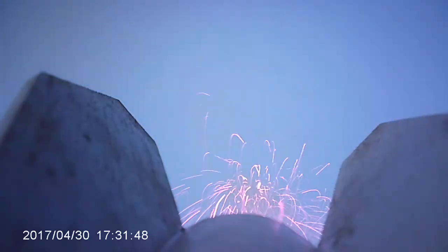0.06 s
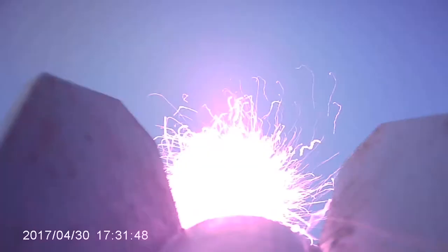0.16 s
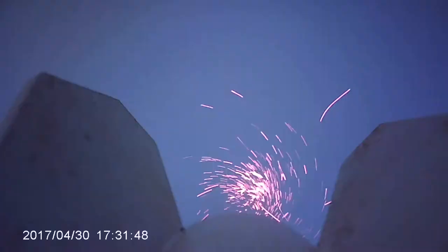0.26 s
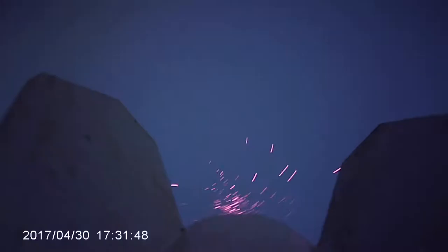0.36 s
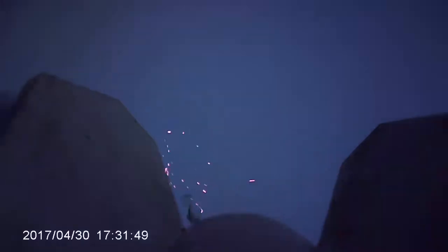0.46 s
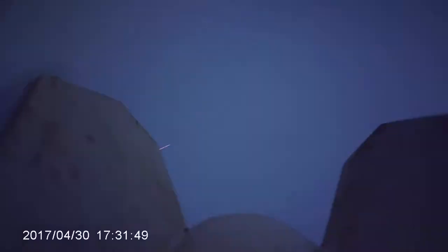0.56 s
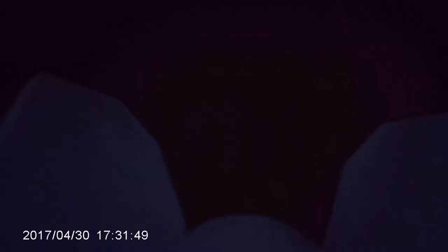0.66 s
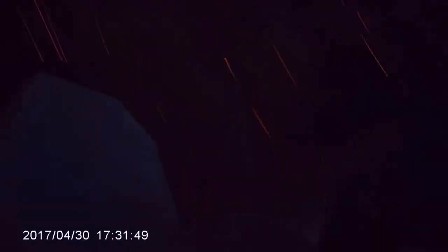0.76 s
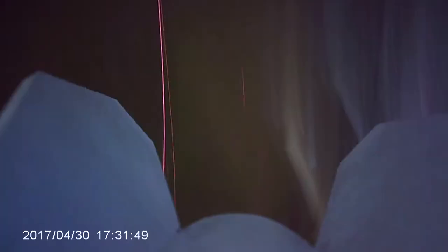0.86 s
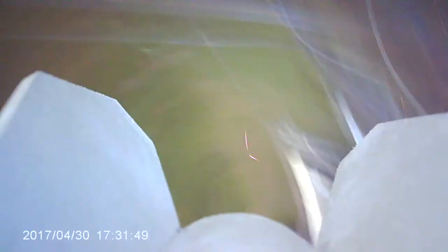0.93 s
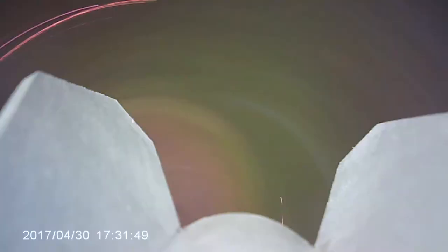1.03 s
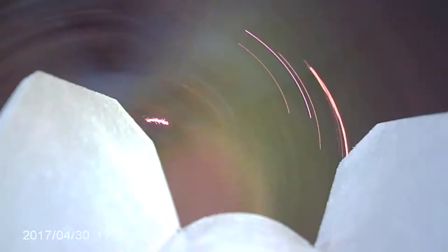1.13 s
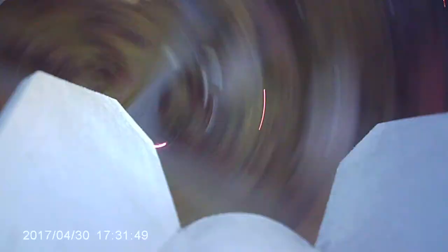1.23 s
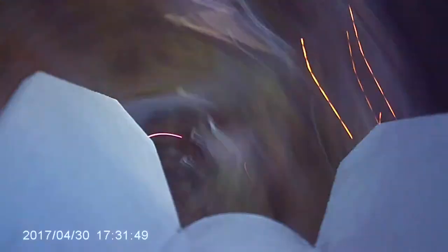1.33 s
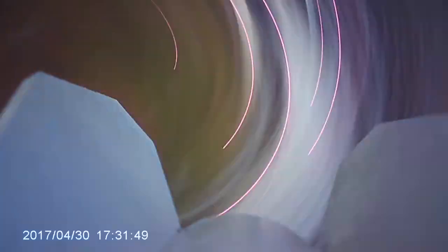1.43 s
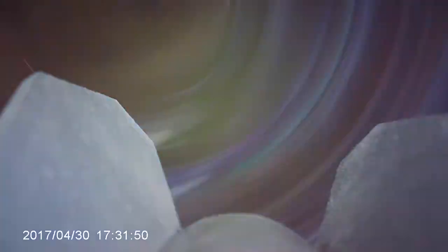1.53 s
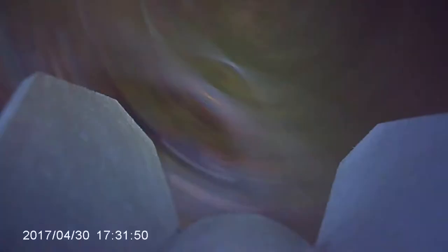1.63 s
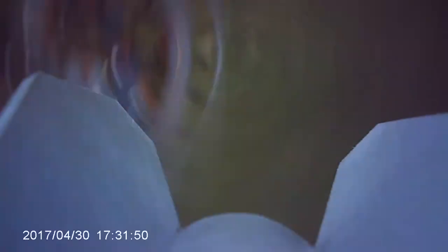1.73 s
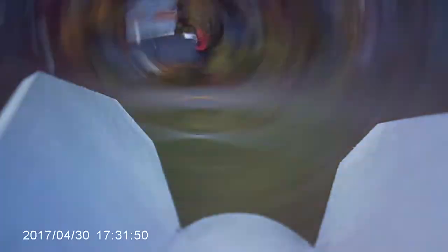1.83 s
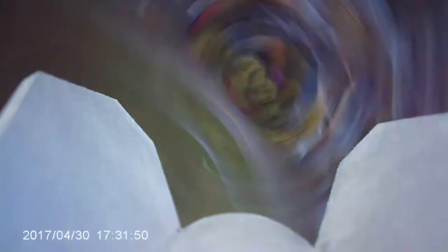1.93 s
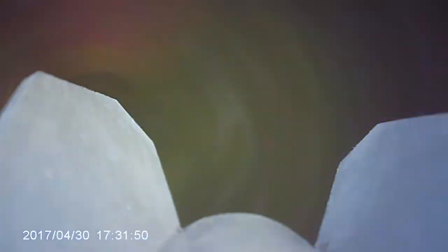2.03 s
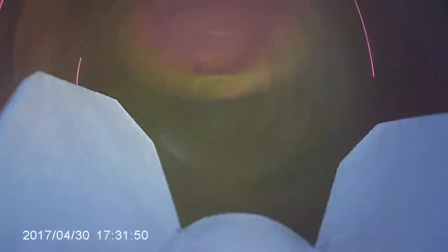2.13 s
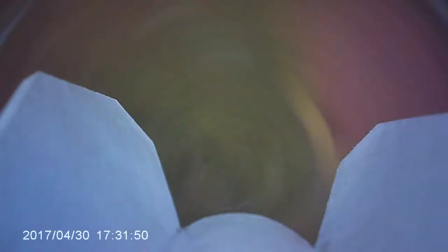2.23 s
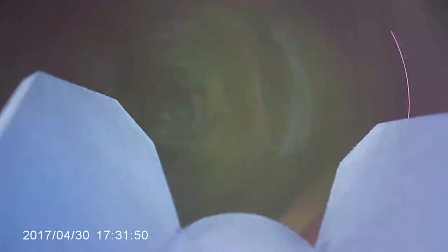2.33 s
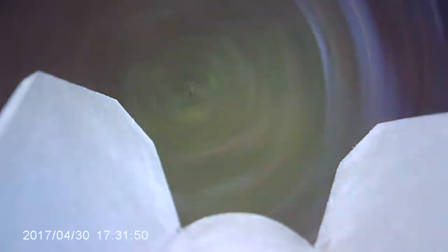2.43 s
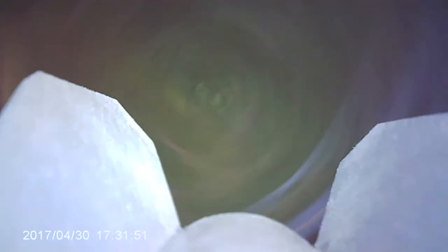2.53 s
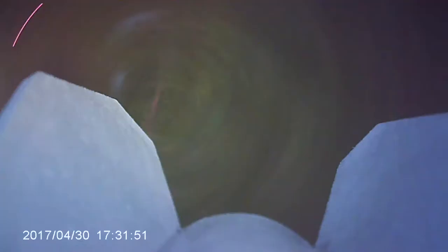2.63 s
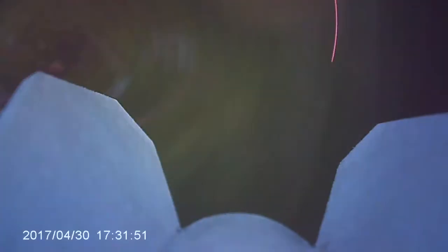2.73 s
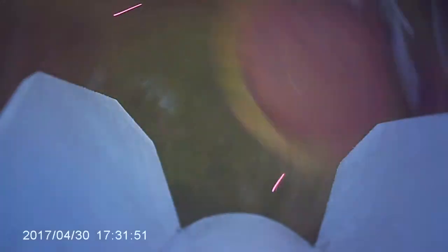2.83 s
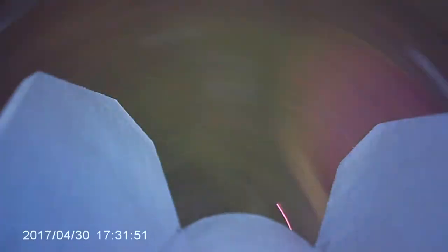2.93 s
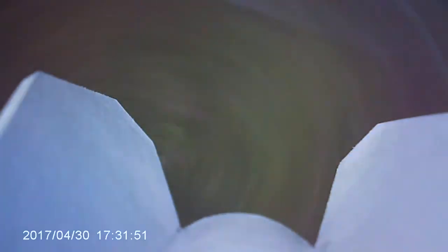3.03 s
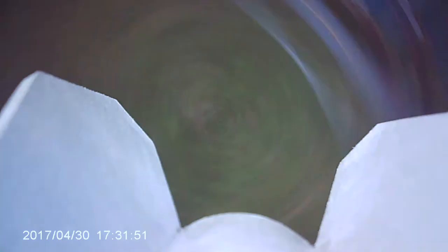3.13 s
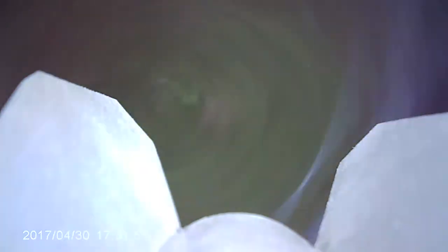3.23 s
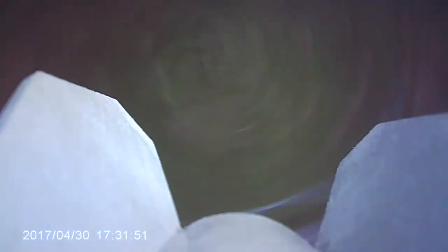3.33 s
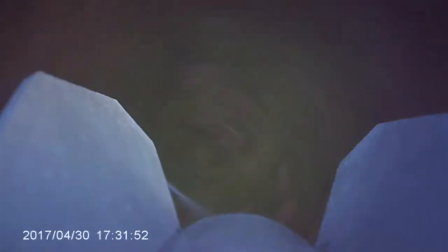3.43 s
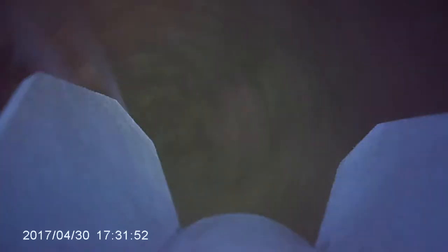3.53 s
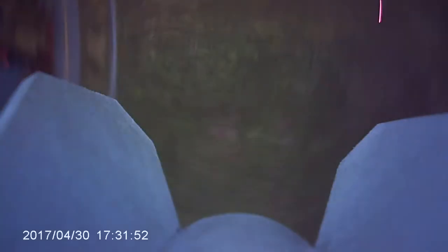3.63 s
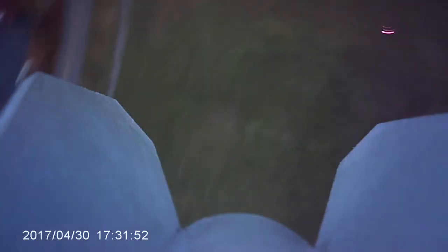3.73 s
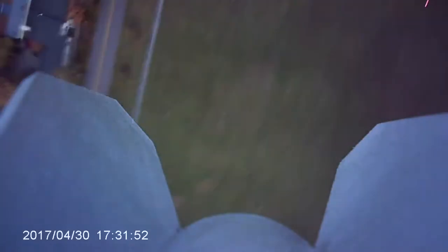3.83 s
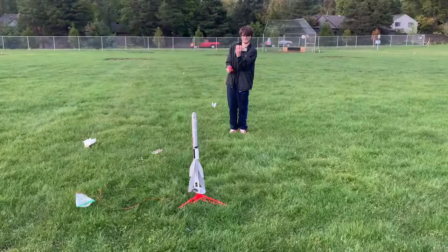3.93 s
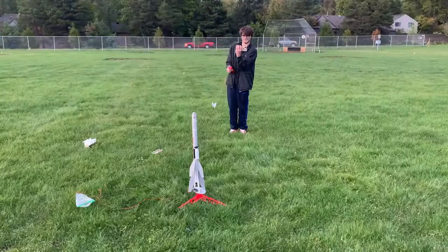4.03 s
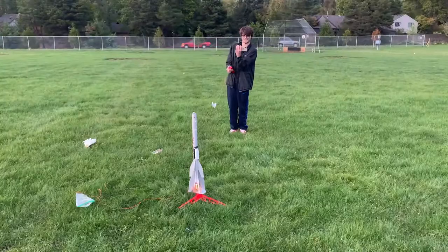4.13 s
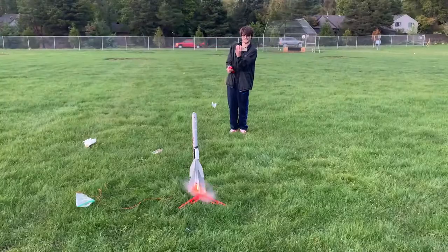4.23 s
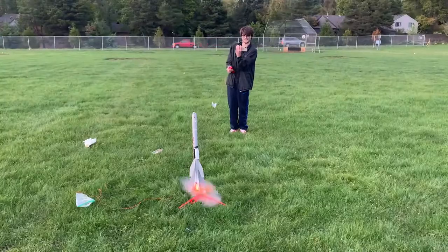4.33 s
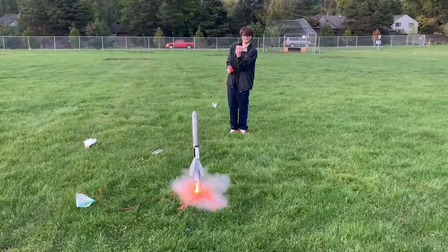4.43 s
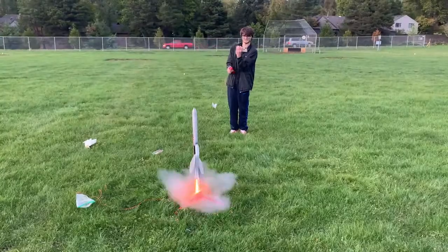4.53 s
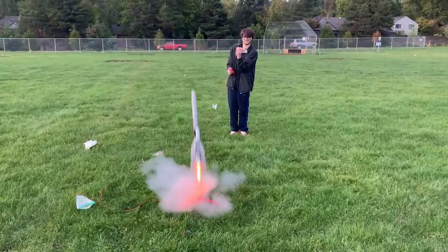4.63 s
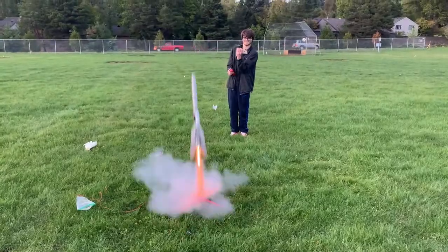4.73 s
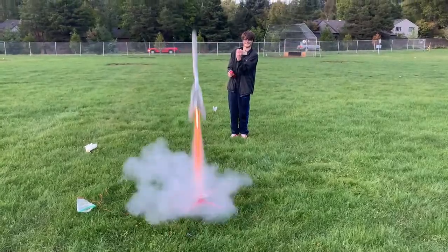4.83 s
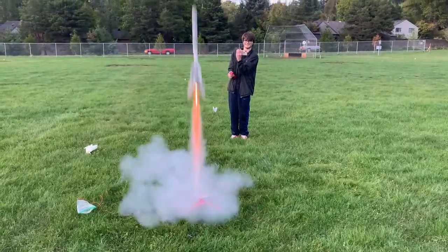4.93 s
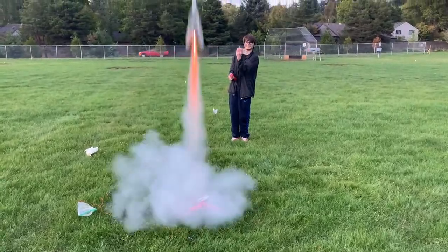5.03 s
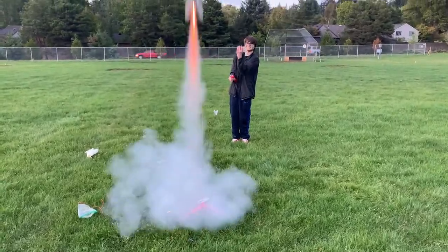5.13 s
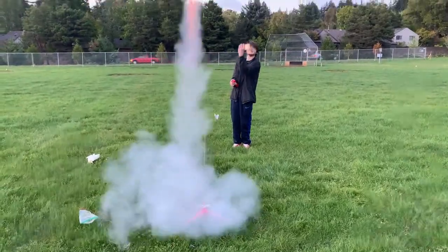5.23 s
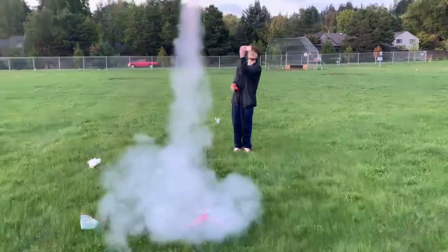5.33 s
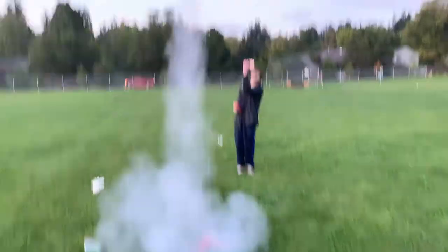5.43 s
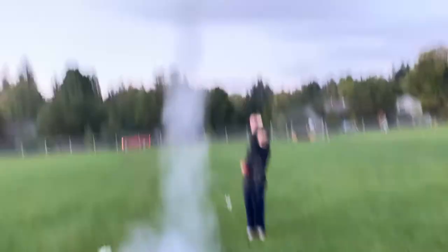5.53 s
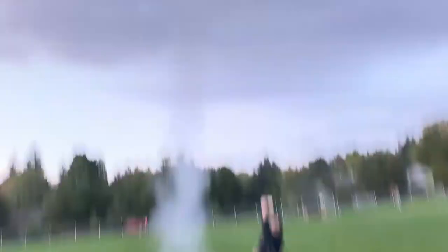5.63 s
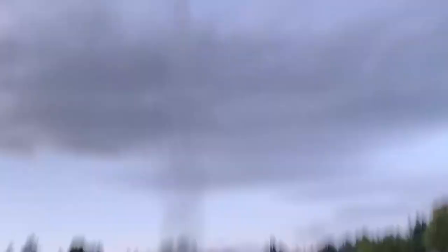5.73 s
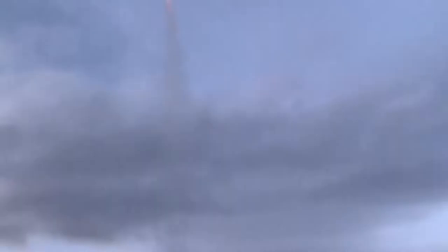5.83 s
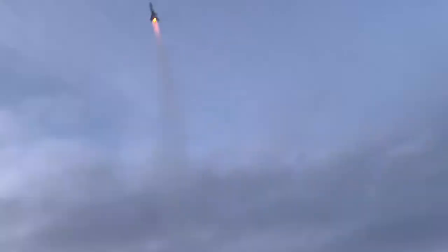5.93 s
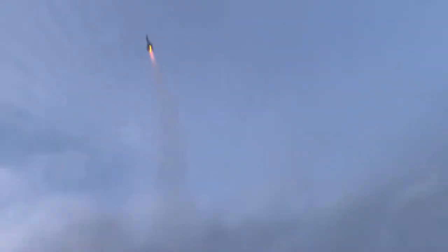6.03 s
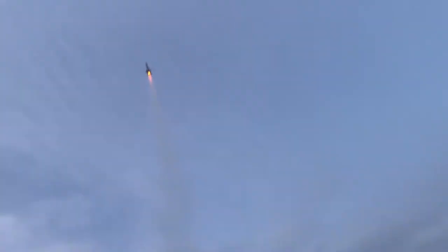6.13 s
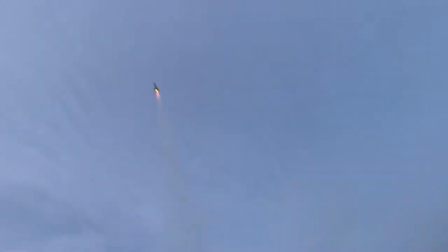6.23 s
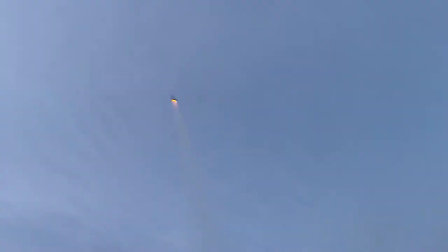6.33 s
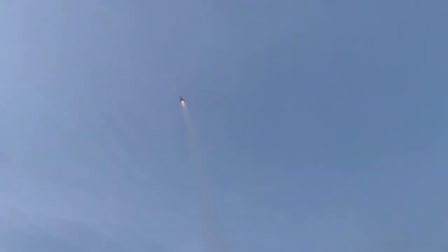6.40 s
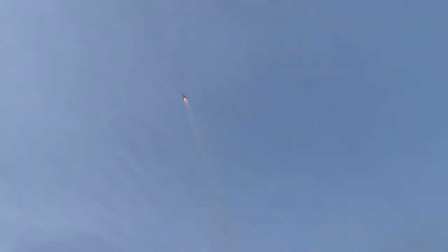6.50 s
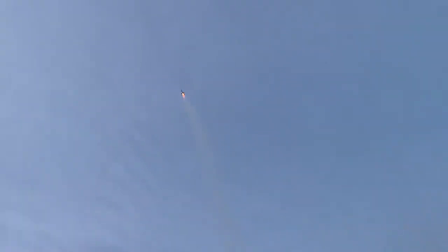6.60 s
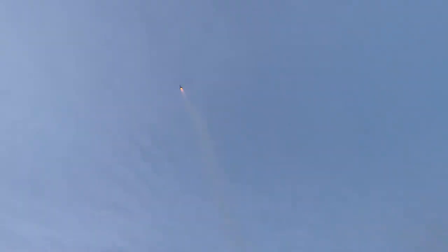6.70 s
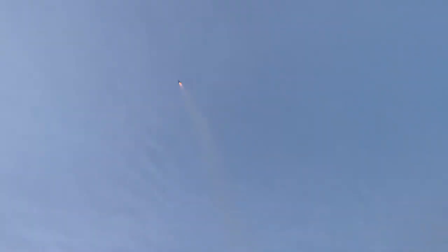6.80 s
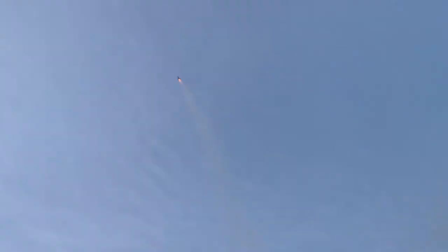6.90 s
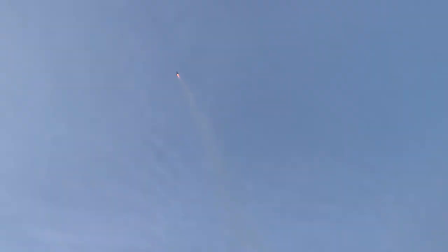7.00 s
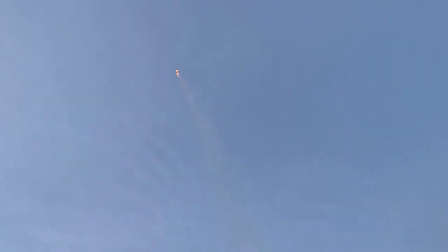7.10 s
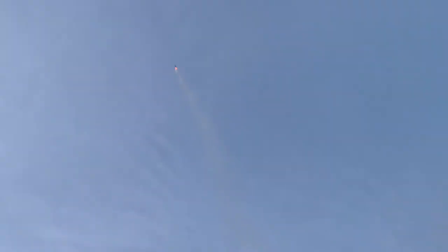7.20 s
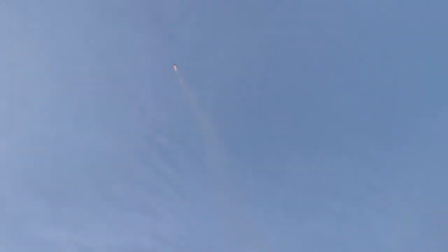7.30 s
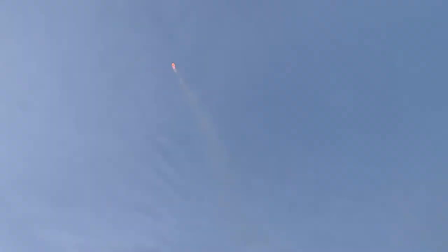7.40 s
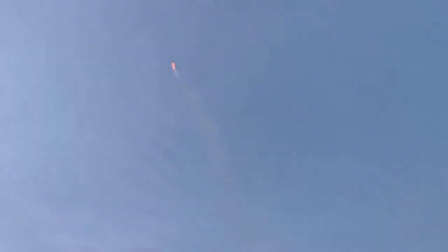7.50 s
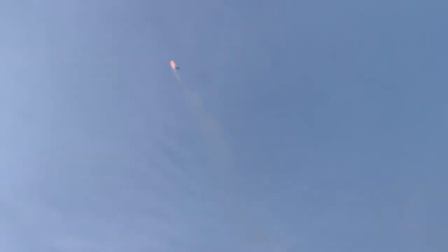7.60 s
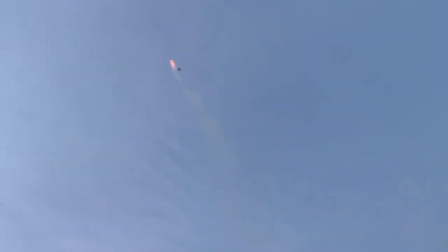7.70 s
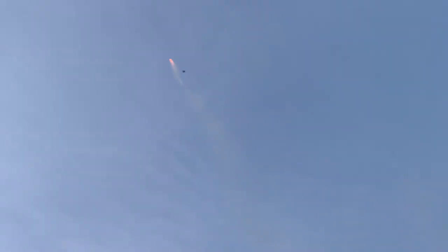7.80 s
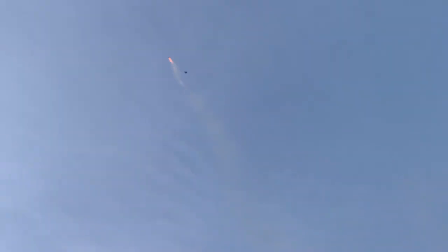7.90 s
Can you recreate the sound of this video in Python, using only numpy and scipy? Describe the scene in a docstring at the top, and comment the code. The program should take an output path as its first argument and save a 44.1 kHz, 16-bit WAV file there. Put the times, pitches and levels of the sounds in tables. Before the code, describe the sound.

Close on a model rocket's body, sharp plastic knocks, tube rattle, hum and buffeting crowd the first half second, with a low motor boom and fizzing sparks. Scattered knocks and rubs thin into faint rumbling air. A cut to an open field brings a slowed ignition pop and loud, broad hiss, which climbs away and fades; much later a second stage swells faintly overhead.

```python
"""Sharp knocks crack out first: we ride on a model rocket whose tube rattles, hums and rubs while air buffets the port.
The motor booms up among sparks (clicks and fizz); later a thin rush of filtered noise is left, with stray thumps.
A quick cut goes to the field: a motor pops alight and hisses off the pad at half speed, climbs away in real
time, burns out at half speed again, and a second stage roars up far overhead. Jets are banded noise whose
eddies swell separately; blows are short bursts through resonances of the tube and the camera shell."""
import sys
import numpy as np
from scipy import signal
from scipy.fft import rfft, irfft
from scipy.io import wavfile
from scipy.ndimage import uniform_filter1d

SR = 44100
rng = np.random.default_rng(int(sys.argv[2]) if len(sys.argv) > 2 else 0)


def inscribe(sig):
    """Save sig as 16-bit PCM at rate SR to the path in sys.argv[1].

    A 1-D sig is mono; a 2-D sig holds one channel per row.
    Samples are clipped to [-1, 1] before scaling.
    """
    pcm = np.round(np.clip(np.atleast_2d(sig).T, -1, 1) * 32767)
    wavfile.write(sys.argv[1], SR, pcm.astype(np.int16))


N = 351036
TIME = np.arange(N) / SR
LOOP = 180000   # samples in one round of noise
FREQS = np.maximum(np.fft.rfftfreq(LOOP, 1 / SR), 1)
CUT_S, REAL_TIME_S, SLOW_AGAIN_S = 3.927, 5.455, 6.897
ON_BOARD_TOP_HZ, SLOW_TOP_HZ, CUTOFF_HZ = 14000, 9700, 15600

# Levels in the tables are relative: each layer adds its own trim.
# A half_width_hz reaches from the centre to the -6 dB point; a half_length_s from the middle to 1/e.

# colour of the slipstream: pitch_hz, density_db
SLIPSTREAM = [(5, 17), (20, 4.5), (50, 1), (120, -9), (300, -15), (700, -19.5), (2000, -26.5), (5000, -32),
              (9000, -34), (13800, -34), (14400, -67)]
SLIPSTREAM_DB, SLIPSTREAM_FLUTTER_DB = -41.5, 2
RUMBLE_STEADY_S, BOOM_STEADY_S = .07, .03
# air pressure buffeting the on-board port: time_s, level_db
BUFFETING = [(0.0, -57), (0.03, -25.5), (0.09, -57), (0.12, -49), (0.14, -35), (0.23, -22), (0.26, -14.5),
             (0.36, -14.5), (0.39, -32), (0.48, -21.5), (0.61, -51), (0.85, -65), (0.87, -37), (1.17, -47),
             (1.19, -40), (1.38, -56.5), (1.98, -44.5), (2.0, -55)]
# colour of the buffeting: pitch_hz, density_db
BUFFET_COLOUR = [(5, -6), (12, 19.5), (18, 0.5), (27, -25), (40, 0.5), (55, -15), (80, -13), (130, -20.5),
                 (250, -28.5), (600, -62.5)]
BUFFET_DB = 9
# bouts in which the airframe shakes: start_s, hold_s, level_db, release_db_per_s
SHAKES = [(-0.002, 0.077, -22.5, 176), (0.16, 0.2, -27.5, 195), (0.43, 0.12, -36, 593.5),
          (0.855, 0.047, -40.5, 23)]
SHAKE_ATTACK_DB_PER_S = 2499
# resonances of the humming tube: centre_hz, half_width_hz, level_db
HUM_MODES = [(165, 12, 10.0), (343, 15, -12), (518, 24, -9)]
# colour of rattle and thud: pitch_hz, density_db
RATTLE_COLOUR = [(70, 0), (150, -7), (215, 0.5), (310, -6), (410, -2.5), (510, -1), (740, -11.5),
                 (1200, -20.5)]
HUM_DB, RATTLE_DB = -11, -11.5
SIZZLE_DB, SIZZLE_FOLLOWS = -34, 0.67   # the sizzle follows only a share of the shaking's swing in dB
# cracks and knocks on the airframe: start_s, level_db, treble_db, thud_db
KNOCKS = [(0.001, -22.5, -56, -40), (0.0108, -19.5, -50, -41), (0.02, -18, -38, -25),
          (0.0304, -18.5, -34, -27), (0.05, -18, -43, -40), (0.0756, -27, -47, -39),
          (0.0836, -51, -35, -50), (0.135, -12, -25.5, -17), (0.188, -28.5, -44, -26.5),
          (0.225, -31, -41.5, -38), (0.2412, -20, -43.5, -17), (0.2582, -18, -39, -33),
          (0.2762, -7, -51.5, -32), (0.3581, -17.5, -27, -17), (0.394, -40, -49.5, -27),
          (0.428, -39, -44, -25.5), (0.436, -29, -40, -41), (0.4705, -27, -43, -22.5),
          (0.601, -49, -63, -37.5), (0.8697, -16, -34, -21.5), (0.891, -12.5, -34, -18),
          (0.9455, -44, -59, -34), (0.9779, -26.5, -57, -27.5), (1.043, -34.5, -62, -42),
          (1.0588, -43, -62, -45), (1.2068, -35, -63, -29), (1.222, -42, -59, -42),
          (1.304, -47, -63, -45.5), (1.4253, -44, -63, -43), (1.439, -39, -67, -37.5),
          (1.518, -40.5, -61, -44)]
# resonances of the camera shell: centre_hz, half_width_hz, level_db
SHELL = [(560, 300, 1), (1203, 180, -11), (1450, 340, -0.5), (1850, 170, -4.5), (2480, 400, -5.5),
         (2780, 320, -1.5), (3360, 190, -7.5), (3270, 150, -5.5), (4070, 120, -14)]
# modes of the body tube: pitch_hz, level_db, t60_s
TUBE = [(168, 1, 0.11), (334.3, 0, 0.054), (517, 3.5, 0.035)]
# colour of a knock's splintering treble: pitch_hz, density_db
SPLINTER = [(3000, -15), (4500, 0.5), (6000, 2.5), (6700, -7), (7800, 3), (10000, -8), (13500, -5.5),
            (14500, -42)]
# colour of loose parts chattering after a knock: pitch_hz, density_db
CHATTER = [(400, 1.5), (1200, -4), (3300, 4.5), (4300, -8), (6500, -13.5), (13000, -23.5)]
CHATTER_DB, CHATTER_T60_S, CHATTER_PER_S = -24.5, .11, 900
KNOCK_BASE_T60_S = 0.044   # each layer of a knock scales this
CRACK_T60_S, SHELL_TAIL_DB = 0.025, -9.5
CONTACT_SPREAD_DB = 2.5   # each knock lands elsewhere and favours other resonances of the shell
# swells of hum as the tube flexes: middle_s, level_db, half_length_s
FLEXES = [(0.048, -28, .026), (0.447, -41, 0.02), (0.521, -22, 0.025), (0.92, -29, 0.012),
          (0.964, -34, 0.042), (1.072, -30, 0.027), (1.24, -40, .025), (1.323, -35.5, 0.018),
          (1.44, -43, 0.024), (1.48, -41, 0.013), (1.572, -46, .014), (1.62, -41, 0.013),
          (1.665, -46, .018)]
FLEX_WANDER = 0.04   # share by which the hum's pitch wanders
# dull thumps as the airframe jolts: start_s, level_db, pitch_hz, t60_s
THUMPS = [(0.023, -5.5, 65, 0.079), (0.039, -24.5, 440, 0.2), (0.139, -4, 55.6, 0.077),
          (.143, -21, 480, 0.035), (0.159, -16.5, 119, 0.075), (0.18, -8.5, 213, 0.056),
          (0.303, -11.5, 150, 0.074), (0.366, -19, 342, 0.16), (0.381, -23, 140, 0.071),
          (0.419, -16.5, 192, 0.073), (.426, -14, 320, 0.049), (.892, -22, 335, 0.12), (0.6, -34, 520, .06),
          (2.095, -45, 165, 0.076), (2.528, -43, 560, .06)]
# the shower of sparks at ignition and its last sputters: time_s, level_db
SPARKS = [(.09, -50), (.15, -55.5), (.205, -48), (.225, -40), (.258, -33), (.28, -29.5), (.295, -42),
          (.318, -42.5), (.338, -59.5), (.37, -48.5), (.41, -65), (.44, -48), (.465, -56), (.49, -55.5),
          (.53, -58), (.56, -64)]
# colour of the sparks: pitch_hz, density_db
SPARK_FIZZ = [(400, 1.5), (1000, -4.5), (2400, -2), (3000, -4), (3350, 6.5), (3750, 4), (4100, -8.5),
              (4600, -14), (6000, -12), (7000, -22.5), (8000, -17), (13000, -28)]
RUB_GRAINS_PER_S, SPARK_GRAINS_PER_S, SIZZLE_GRAINS_PER_S = 1200, 700, 700
# boom of the motor coming up to pressure, heard on board: time_s, level_db
BOOM = [(.125, -59), (.145, -20), (.2, -22), (.24, -19.5), (.265, -14.5), (.31, -20), (.365, -21),
        (.41, -32.5), (.48, -33.5), (.545, -37), (.58, -61.5)]
# colour of the boom: pitch_hz, density_db
BOOM_COLOUR = [(15, -16), (30, 5), (50, 3), (80, -9.5), (150, -12.5), (330, -19), (550, -23), (900, -40)]
# breathy whistles as flame spurts through the nozzle: middle_s, level_db, half_length_s, centre_hz, half_width_hz
SPURTS = [(0.2597, -24, 0.0037, 3680, 130), (0.269, -31.5, 0.0033, 3550, 150),
          (0.282, -23.5, .004, 3800, 150)]
# gritty rubs of the camera shell against the tube: middle_s, level_db, half_length_s
RUBS = [(0.517, -47, 0.013), (0.67, -57, 0.019), (0.966, -50, 0.0065), (1.018, -55, 0.019),
        (1.178, -56, 0.013), (1.194, -52, 0.0056), (1.307, -51, 0.0064), (1.333, -51, .005),
        (1.472, -55, .006), (1.52, -53, 0.011), (1.583, -52, .009), (1.607, -50, .007)]
# resonances of a rub: centre_hz, half_width_hz, level_db
RUB_MODES = [(1800, 300, -6.5), (2710, 200, -1), (3320, 210, -4)]
# dry snaps close to the port: start_s, level_db
SNAPS = [(0.5508, 1.5)]
# resonances of a snap: centre_hz, half_width_hz, level_db
SNAP_MODES = [(1100, 900, -18), (2350, 300, -8), (2950, 330, 0), (3900, 450, -12), (5400, 600, -21),
              (7900, 700, -11), (12500, 1000, -21)]

# wind on the field, a gust that drops to a light breeze: time_s, level_db
BREEZE = [(3.94, -37.5), (4.2, -37), (4.48, -64.5), (4.85, -66.5), (7.95, -66)]
# colour of the wind on the field: pitch_hz, density_db
FIELD_WIND = [(12, -24.5), (34, -1), (55, -7), (90, -7.5), (140, -18.5), (300, -25.5), (500, -24),
              (800, -30.5), (2000, -48.5)]
# colour of the quiet open air over the field: pitch_hz, density_db
OPEN_AIR = [(60, -6), (200, -5.5), (600, -11), (1500, -15), (5000, -10.5)]
OPEN_AIR_DB = -72
# the ground camera's pair of ports, phase at true speed: pitch_hz, left_lead_rad
PORT_PHASE = [(0, 0), (1500, .6), (2000, 0), (3300, 1.6), (4700, 1.6), (5800, 3.1), (7100, 3.14), (9300, 0),
              (11400, -3.08), (11750, -3.2), (14000, -6.28), (16100, -9.37), (16700, -9.47), (18400, -12.5)]
# balance of the ports at true speed: pitch_hz, left_minus_right_db
PORT_BALANCE = [(300, 0), (700, 2), (1500, 4), (2400, 0), (3600, -4), (4600, -5), (6000, -4.5),
                (7000, -1.5), (8000, 0)]
# likeness of the ports at true speed: pitch_hz, likeness (0 to 1)
PORT_LIKENESS = [(300, .995), (1300, .93), (1900, .55), (2800, .9), (4600, .78), (6200, .9), (7000, .99),
                 (9000, .94), (10800, .985), (11300, .9995), (12000, .9995), (13500, .95), (15200, .98),
                 (15900, .9999), (17000, .9999), (18500, .96)]
# pops and thumps of the motor: start_s, level_db, centre_hz, t60_s
POPS = [(4.011, -22, 5030, .04), (4.0175, -15.5, 1070, 0.02), (4.026, -2.5, 5200, 0.014),
        (4.03, -13, 5200, 0.016), (4.754, -15, 686, 0.038), (5.699, -39.5, 83, 0.53),
        (5.949, -21, 1490, 0.015), (7.124, -35, 270, 0.066)]
# diving tones at ignition and burn-out: start_s, level_db, start_hz, end_hz, glide_s
WHOOPS = [(4.016, -24, 700, 100, .005), (7.124, -42, 560, 90, .006)]
# the igniter's crack, one short pressure wave: middle_s, peak_db, half_length_s
IGNITER = (4.0184, -14, .00019)
IGNITER_ECHO_S, IGNITER_ECHO_DB = 0.00098, -21
# brief hollow surges in the exhaust: middle_s, level_db, half_length_s, centre_hz, half_width_hz
SURGES = [(4.058, -30, 0.02, 5200, 300), (4.63, -25, 0.051, 1930, 201), (4.906, -39, 0.18, 2340, 200),
          (4.93, -26, 0.027, 4470, 330), (5.27, -34.5, 0.054, 2070, 140)]
# borders between eddy sizes at true speed, rumble to top hiss: split_hz
JET_SPLITS_HZ = [1200, 6000, 12000]
# exhaust at true speed, from the side on the pad: pitch_hz, density_db
PAD_JET = [(60, -36), (200, -23.5), (550, -16), (900, -16), (1300, -12.5), (2000, -8), (3000, -4.5),
           (4200, 0.5), (5200, -2.5), (6500, 7), (9500, 8), (13500, -0.5), (17000, -4), (19000, -13)]
# exhaust at true speed, from behind in the sky: pitch_hz, density_db
SKY_JET = [(60, -31.5), (200, -28), (520, -18.5), (900, -15.5), (1400, -8), (2200, 0), (3300, -1),
           (4100, -2.5), (4700, -2), (6000, 6.5), (8000, 10.5), (9500, 11), (13500, 1.5), (17000, -2),
           (19000, -10.5)]
PAD_DISTANCE_M, CAMERA_HEIGHT_M, NOZZLE_M = 6, 2.127, .3   # NOZZLE_M is its height on the pad
ACCELERATION_M_PER_S2, RELEASE_S, SOUND_M_PER_S = 20.6, 4.275, 343
# strength of the burn at lift-off: time_s, level_db
BURN = [(4.03, -20), (4.048, -26), (4.12, -25), (4.156, -18.5), (4.33, -15), (4.42, -17.5), (4.428, -20),
        (4.46, -16), (4.626, -18.5), (4.824, -27.5), (4.95, -27), (5.128, -26.5), (5.216, -24.5),
        (5.45, -22.5)]
IGNITION_S, IGNITION_DB_PER_S = 4.028, 1088
# The next lists have one value per eddy size: rumble, roar, hiss, top hiss.
# the free jet: level_db
FREE_JET_DB = [-26.5, -9.5, -5, -4]
# added while the jet strikes the pad: boost_db
PAD_BLAST_DB = [4.5, 0.5, -0.56, -3.5]
PAD_BLAST_ENDS_M, PAD_BLAST_FADE_M = 1.2, 0.47
# the jet from behind, at the distance of the pad: level_db
CLIMB_DB = [-47.5, -32.5, -22.5, -18]
# fading with distance: loss_db per doubling
LOSS_PER_DOUBLING_DB = [4.93, 6.9, 10.6, 15.5]
# the jet around staging: level_db
STAGING_DB = [-9, 1.1, -1, -3.5]
# added as the second stage flares up: boost_db
FLARE_DB = [12.5, 6, -1, -7]
# thrust as the first stage burns out and the second lights: time_s, level_db
STAGE_THRUST = [(6.9, -55.5), (7.128, -55.5), (7.142, -70), (7.29, -87), (7.38, -73.5), (7.5, -52.5),
                (7.6, -49.5), (7.95, -53)]
FLARE_S, FLARE_RISE_S, FLARE_FALL_S = 7.68, 0.12, 0.2
MOTTLE_DB = 1.6


def from_db(db):
    """Decibels to gain."""
    return 10 ** (np.asarray(db) / 20)


def rms_one(x):
    """Scale so that the centre of the image has rms 1."""
    return x / np.sqrt(np.mean(np.atleast_2d(x).mean(axis=0) ** 2) + 1e-20)


def in_time(rows):
    """Draw a level curve through time_s, level_db points."""
    return np.interp(TIME, *np.transpose(rows))


def over_freqs(points, speed=1):
    """Read a table on a log-frequency axis; slow motion moves it down."""
    hz, value = np.transpose(points)
    return np.interp(np.log(FREQS / speed), np.log(hz), value)


def white():
    """Spectrum of fresh white noise."""
    return rng.standard_normal(len(FREQS)) + 1j * rng.standard_normal(len(FREQS))


def sound(spectrum):
    """Spectrum to signal of rms 1, looped without a seam; the loop outlasts each of the two shots."""
    return np.tile(rms_one(irfft(spectrum, LOOP)), 2)[..., :N]


def noise(colour):
    """Noise of a given colour, falling away above its last point."""
    top_hz = colour[-1][0]
    return sound(white() * from_db(over_freqs(colour)) / (1 + (FREQS / top_hz) ** 4))


def drift(rate_hz):
    """Slow chance with spread 1."""
    return sound(white() / (1 + (FREQS / rate_hz) ** 2))


def resonances(modes):
    """Summed gain of steep-sided resonances."""
    power = 0
    for hz, half_width, db in modes:
        detuning = (FREQS - hz ** 2 / FREQS) / (2 * half_width)
        power = power + from_db(db) ** 2 / (1 + detuning ** 2) ** 2
    return np.sqrt(power)


def resonant_noise(modes):
    """Noise in a set of resonances."""
    return sound(white() * resonances(modes))


def grains(per_s, spread_db):
    """Spectrum of randomly timed clicks of either sign and uneven size."""
    sizes = from_db(spread_db * np.minimum(rng.exponential(1, LOOP), 4))
    signed = sizes * rng.choice([-1, 1], LOOP)
    return rfft(signed * (rng.random(LOOP) < per_s / SR))


def bursts(times, levels_db, t60s, rise_s):
    """Envelope of blows that swell quickly and die away, each for a quarter second at most."""
    out = np.zeros(N)
    for s, db, t60 in zip(times, levels_db, t60s):
        start = max(int(s * SR), 0)
        age = TIME[:min(SR // 4, N - start)]
        decay = from_db(db - 60 * age / max(t60, .002))
        out[start:start + len(age)] += decay * (1 - np.exp(-age / rise_s))
    return out


def swell(middle, half_length):
    """A smooth rise and fall of height 1."""
    return np.exp(-np.minimum(((TIME - middle) / half_length) ** 2, 50))


def ring(clicks, hz, t60):
    """A unit click sets a decaying sine of about height 1 ringing."""
    r, w = from_db(-60 / (t60 * SR)), 2 * np.pi * hz / SR
    return signal.lfilter([0, np.sin(w)], [1, -2 * r * np.cos(w), r * r], clicks + 1e-18)


def shot(start, end, size=256):
    """Gate for one stretch of time, with short fades (size in samples)."""
    return uniform_filter1d(1. * ((TIME >= start) & (TIME < end)), size=size)


def evened(x, over_s=RUMBLE_STEADY_S):
    """Take the slow swells and dips out of a rumble."""
    power = uniform_filter1d(x ** 2, size=int(over_s * SR))
    return x * np.sqrt(power.mean() / (power + 1e-12))


def slipstream():
    """An even rumble under a thin rush of air that flutters in its low mids."""
    air = noise(SLIPSTREAM)
    rumble_band = signal.butter(2, [25, 200], "band", fs=SR, output="sos")
    flutter_band = signal.butter(2, [250, 1000], "band", fs=SR, output="sos")
    rumble = signal.sosfiltfilt(rumble_band, air)
    low_mids = signal.sosfiltfilt(flutter_band, air)
    flutter = low_mids * (from_db(SLIPSTREAM_FLUTTER_DB * drift(13)) - 1)
    return from_db(SLIPSTREAM_DB) * (air - rumble + evened(rumble) + flutter)


def buffeting():
    """Lumpy air pressure pushes on the port as a low rumble."""
    return from_db(in_time(BUFFETING) + BUFFET_DB) * evened(noise(BUFFET_COLOUR))


def shaking():
    """Level of the airframe's shaking in dB: each bout rises fast, holds and dies away."""
    bouts = []
    for start, hold, db, release in SHAKES:
        attack_db = np.maximum(start - TIME, 0) * SHAKE_ATTACK_DB_PER_S
        release_db = np.maximum(TIME - start - hold, 0) * release
        bouts.append(db - attack_db - release_db)
    return np.max(bouts, axis=0)


def humming():
    """Shaking excites narrow resonances of the tube."""
    return from_db(shaking() + HUM_DB + 1.3 * drift(12)) * resonant_noise(HUM_MODES)


def rattling():
    """Shaking rattles the airframe as unsteady broadband noise."""
    return from_db(shaking() + RATTLE_DB + 2.0 * drift(30)) * noise(RATTLE_COLOUR)


def sizzling():
    """Shaking makes the shell sizzle: fine clicks through its resonances."""
    crackle = sound(grains(SIZZLE_GRAINS_PER_S, spread_db=4) * resonances(SHELL))
    return from_db(SIZZLE_DB + SIZZLE_FOLLOWS * shaking() + 1.8 * drift(13)) * crackle


def struck_shell(s, level_db):
    """A brief crack and a softer tail in each resonance of the shell, with a new balance for every blow."""
    out, even = 0, np.ones(len(s))
    total_db = 10 * np.log10(sum(from_db(db) ** 2 for _, _, db in SHELL))
    chances = rng.uniform(-1, 1, (len(SHELL), len(s)))
    for (hz, half_width, db), chance in zip(SHELL, chances):
        contact_db = np.sqrt(3) * CONTACT_SPREAD_DB * chance   # uniform chance scaled to this spread
        mode_db = level_db + db - total_db + contact_db
        crack = bursts(s, mode_db - 3.5, even * CRACK_T60_S, rise_s=0.00054)
        tail = bursts(s, mode_db - 7.5 + SHELL_TAIL_DB, even * KNOCK_BASE_T60_S * 1.28, rise_s=0.00045)
        out = out + resonant_noise([(hz, half_width, 0)]) * (crack + tail)
    return out


def knocks():
    """Each blow rattles the shell, splinters in the treble, leaves loose parts chattering and rings the tube."""
    s, level_db, treble_db, thud_db = np.transpose(KNOCKS)
    even = np.ones(len(s))
    shell = struck_shell(s, level_db)
    splinter_envelope = bursts(s, treble_db - 4.5, even * KNOCK_BASE_T60_S * 0.65, rise_s=0.00059)
    splinter = noise(SPLINTER) * splinter_envelope
    thud_envelope = bursts(s, thud_db - 4.5, even * KNOCK_BASE_T60_S * 2.7, rise_s=0.0004)
    thud = noise(RATTLE_COLOUR) * thud_envelope
    ticks = sound(grains(CHATTER_PER_S, spread_db=6.5) * from_db(over_freqs(CHATTER)))
    chatter = ticks * bursts(s, level_db + CHATTER_DB, even * CHATTER_T60_S, rise_s=.003)
    clicks = np.zeros(N)
    clicks[np.maximum(s * SR, 0).astype(int)] = from_db(thud_db - 5.5)
    tube = 0
    for hz, db, t60 in TUBE:
        varied = clicks * from_db(0.99 * rng.standard_normal(N))   # every blow excites each mode afresh
        tube = tube + ring(varied, hz, t60) * from_db(db)
    return shell + splinter + thud + chatter + tube


def flexing():
    """The tube's lowest mode swells and wanders in pitch, with a weak octave above it."""
    lowest_hz = TUBE[0][0]
    phase = 2 * np.pi * np.cumsum(lowest_hz * (1 + FLEX_WANDER * drift(17))) / SR
    tone = np.sin(phase) + from_db(-20.5) * np.sin(2 * phase)
    return tone * sum(from_db(db) * swell(s, half_length) for s, db, half_length in FLEXES)


def thumps():
    """Each jolt gives a few cycles of a low, unsteady note."""
    out, waver = 0, 1 + 0.058 * drift(40)
    for s, db, hz, t60 in THUMPS:
        phase = 2 * np.pi * hz * np.cumsum(waver * (TIME > s)) / SR
        out = out + np.sin(phase) * bursts([s], [db], [t60], rise_s=0.0054)
    return out


def sparks():
    """A shower of fine clicks over a little fizz."""
    clicks = sound(grains(SPARK_GRAINS_PER_S, spread_db=4.5) * from_db(over_freqs(SPARK_FIZZ)))
    fizz = from_db(-3.0) * noise(SPARK_FIZZ)
    return from_db(in_time(SPARKS)) * (clicks + fizz) * shot(SPARKS[0][0], SPARKS[-1][0])


def boom():
    """The lighting motor shakes the airframe with one unbroken low roar."""
    roar = evened(noise(BOOM_COLOUR), BOOM_STEADY_S)
    return from_db(in_time(BOOM)) * roar * shot(BOOM[0][0], BOOM[-1][0])


def spurts():
    """Narrow bands of hiss that flash up among the sparks."""
    return sum(from_db(db) * swell(s, half_length) * resonant_noise([(hz, half_width, 0)])
               for s, db, half_length, hz, half_width in SPURTS)


def rubs():
    """Short runs of tiny slips ring in the shell."""
    grit = sound(grains(RUB_GRAINS_PER_S, spread_db=-0.5) * resonances(RUB_MODES))
    return grit * sum(from_db(db) * swell(s, half_length) for s, db, half_length in RUBS)


def snaps():
    """Very short, bright cracks that leave the tube still."""
    s, level_db = np.transpose(SNAPS)
    envelope = bursts(s, level_db, np.full(len(s), .008), rise_s=.0003)
    return from_db(-7.5) * resonant_noise(SNAP_MODES) * envelope


def small_camera(pressure):
    """The on-board amplifier sits a little off centre, overloads on the biggest surges and passes no high treble."""
    biased = pressure - .029
    rounded = biased / (1 + np.square(biased) ** 3) ** (1 / 6)
    return signal.sosfilt(signal.ellip(8, .1, 70, ON_BOARD_TOP_HZ, fs=SR, output="sos"), rounded)


def on_board():
    """Buffeting and shaking settle away, leaving the slipstream; motor sounds and single blows lie on top."""
    settling = np.interp(TIME, [1.55, 2.05], [1, 0])
    shaken = (buffeting() + humming() + rattling() + sizzling()) * settling
    motor = sparks() + boom() + spurts()
    airframe = knocks() + flexing() + thumps() + rubs() + snaps()
    return slipstream() + shaken + motor + airframe


def breeze():
    """A gust drops to a light breeze over quiet open air, both as coloured noise."""
    wind = from_db(in_time(BREEZE) - 3.0) * noise(FIELD_WIND)
    return wind + from_db(OPEN_AIR_DB) * noise(OPEN_AIR)


def at_ports(speed):
    """Spectra of noise at two spaced ports: the housing delays and shades each in its own way."""
    alike = np.clip(over_freqs(PORT_LIKENESS, speed), 0, 1)
    sides = np.array([[1], [-1]])
    phase = np.interp(FREQS / speed, *np.transpose(PORT_PHASE))
    pair = np.sqrt(1 + alike) * white() + np.sqrt(1 - alike) * white() * sides
    return pair * np.exp(.5j * phase * sides) * from_db(.5 * over_freqs(PORT_BALANCE, speed) * sides)


def pops():
    """Short puffs of air: the igniter fires, then the burn spits now and then."""
    out, blast = 0, at_ports(.495) * (FREQS < SLOW_TOP_HZ)
    for s, level_db, hz, t60 in POPS:
        puff = sound(blast / (1 + (FREQS / hz - hz / FREQS) ** 2))
        out = out + puff * bursts([s], [level_db - 11.5], [t60], rise_s=0.00038)
    return out


def whoops():
    """Sudden changes of chamber pressure give short tones that dive in pitch."""
    out = 0
    for s, level_db, start_hz, end_hz, glide_s in WHOOPS:
        hz = end_hz + (start_hz - end_hz) * np.exp(-np.maximum(TIME - s, 0) / glide_s)
        tone = np.sin(2 * np.pi * np.cumsum(hz) / SR)
        out = out + tone * bursts([s], [level_db], [.07], rise_s=0.016)
    return out


def igniter():
    """One push and pull of pressure, then its reflection from the pad."""
    s, peak_db, half_length = IGNITER

    def wave(middle):
        """Slope of a smooth swell, scaled to peak at 1."""
        return (middle - TIME) / half_length * swell(middle, half_length) * np.sqrt(2 * np.e)

    return from_db(peak_db) * (wave(s) + from_db(IGNITER_ECHO_DB) * wave(s + IGNITER_ECHO_S))


def flight():
    """Playback speed, and the height and distance (m) of the steadily accelerating rocket."""
    speed = np.where((TIME >= REAL_TIME_S) & (TIME < SLOW_AGAIN_S), 1, .5)
    flown_s = np.cumsum(speed * (TIME > RELEASE_S)) / SR
    height = NOZZLE_M + .5 * ACCELERATION_M_PER_S2 * flown_s ** 2
    return speed, height, np.hypot(height, PAD_DISTANCE_M)


def exhaust(levels, colour, speed, flutter_db, crackle_db, air_loss_db=0):
    """Turbulent jet: the burn flutters and crackles, and air swallows the treble (loss given at 10 kHz)."""
    true_hz = FREQS / speed
    absorbed_db = air_loss_db * np.minimum(true_hz / 10000, 2) ** 2
    coloured = at_ports(speed) * from_db(over_freqs(colour, speed) - absorbed_db)
    spectrum = coloured * (true_hz < 2 * SLOW_TOP_HZ)
    below = [0] + [1 / (1 + (true_hz / hz) ** 10) for hz in JET_SPLITS_HZ] + [1]
    # large eddies rumble and small ones hiss; each size swells on its own
    eddies = sum(from_db(db + 1.0 * drift(30 * speed)) * sound(spectrum * (upper - lower))
                 for db, lower, upper in zip(levels, below, below[1:]))
    return eddies * from_db(flutter_db * drift(60 * speed) + crackle_db * drift(400 * speed))


def liftoff():
    """The motor lights abruptly; its jet sounds deeper while it still strikes the pad."""
    _, height, _ = flight()
    burn_db = in_time(BURN) - IGNITION_DB_PER_S * np.maximum(IGNITION_S - TIME, 0)
    on_pad = np.clip((PAD_BLAST_ENDS_M - height) / PAD_BLAST_FADE_M, 0, 1)
    levels = [burn_db + free_db + blast_db * on_pad for free_db, blast_db in zip(FREE_JET_DB, PAD_BLAST_DB)]
    return from_db(-0.5) * exhaust(levels, PAD_JET, speed=0.4958, flutter_db=0.5, crackle_db=0)


def surges():
    """Now and then one narrow band of the jet rings out."""
    jet = at_ports(.495) * (FREQS < SLOW_TOP_HZ)
    return sum(from_db(db) * swell(s, half_length) * sound(jet * resonances([(hz, half_width, 0)]))
               for s, db, half_length, hz, half_width in SURGES)


def climb():
    """The jet fades with distance, the fine hiss fastest."""
    _, _, distance = flight()
    doublings = np.log2(distance / PAD_DISTANCE_M)
    levels = [db - loss_db * doublings for db, loss_db in zip(CLIMB_DB, LOSS_PER_DOUBLING_DB)]
    return from_db(-2.0) * exhaust(levels, SKY_JET, speed=0.99, flutter_db=-0.1, crackle_db=-0.5)


def staging():
    """The jet follows the thrust; the second stage starts with a swell of low roar."""
    flare = np.exp(-((TIME - FLARE_S) / np.where(TIME < FLARE_S, FLARE_RISE_S, FLARE_FALL_S)) ** 2)
    thrust_db = in_time(STAGE_THRUST)
    levels = [thrust_db + db + flare_db * flare for db, flare_db in zip(STAGING_DB, FLARE_DB)]
    return from_db(0.4) * exhaust(levels, SKY_JET, speed=0.497, air_loss_db=7.5, flutter_db=0.0, crackle_db=1.0)


def mottled(x):
    """Narrow bands of the jet swell and sink at random, so that its colour never sits still."""
    bands = signal.stft(x, nperseg=1024)[2]
    chance = rng.standard_normal(bands.shape[1:])
    chance = uniform_filter1d(chance, size=3, axis=0)   # across neighbouring bands
    chance = uniform_filter1d(chance, size=7, axis=1)   # across time
    return signal.istft(bands * from_db(MOTTLE_DB * chance / chance.std()))[1][:, :N]


def over_ground(x, echo_db):
    """The lawn returns a dull copy; its lag grows with elevation and sweeps a comb down through the hiss."""
    speed, height, distance = flight()
    lag_s = 2 * CAMERA_HEIGHT_M / SOUND_M_PER_S * height / distance / speed
    dull = signal.sosfilt(signal.butter(1, 5000, fs=SR, output="sos"), x)
    return x + from_db(echo_db) * np.array([np.interp(TIME - lag_s, TIME, side) for side in dull])


def slowed(x):
    """Slow motion holds no high treble."""
    return signal.sosfilt(signal.ellip(8, .1, 80, SLOW_TOP_HZ, fs=SR, output="sos"), x)


def from_field():
    """Lift-off at about half speed, the climb in about real time, staging at about half speed again."""
    motor = liftoff() * shot(CUT_S, REAL_TIME_S)
    motor = motor + climb() * shot(REAL_TIME_S, SLOW_AGAIN_S)
    motor = motor + staging() * shot(SLOW_AGAIN_S, np.inf)
    direct_and_echo = over_ground(mottled(motor), echo_db=-11)
    return breeze() * shot(CUT_S, np.inf) + slowed(pops() + igniter() + surges()) + whoops() + direct_and_echo


def scene():
    """The mono on-board camera, then a quick cut to the stereo camera on the ground."""
    return small_camera(on_board()) * shot(0, CUT_S, size=24) + from_field()


def record(dry):
    """A steep low-pass cuts the top."""
    return signal.sosfilt(signal.ellip(10, .1, 90, CUTOFF_HZ, fs=SR, output="sos"), dry)


dry = scene()
out = record(dry)
inscribe(out)
```